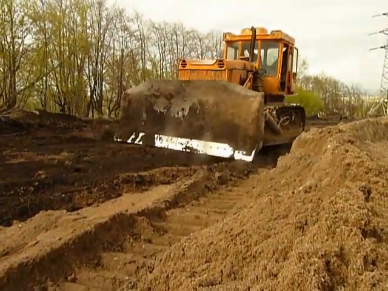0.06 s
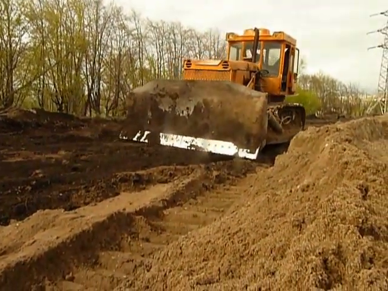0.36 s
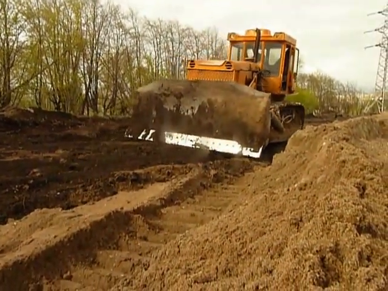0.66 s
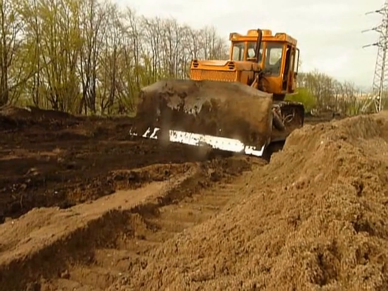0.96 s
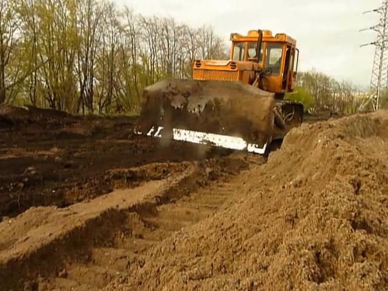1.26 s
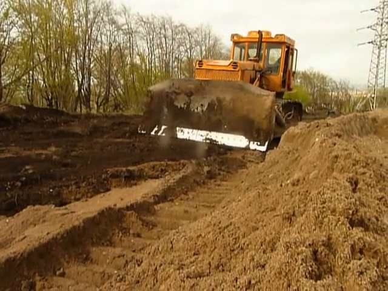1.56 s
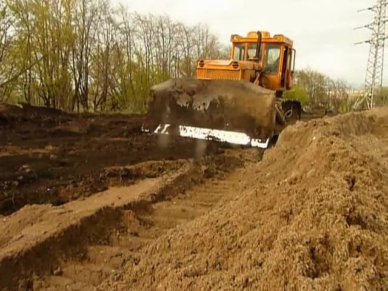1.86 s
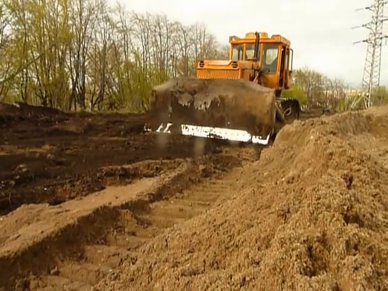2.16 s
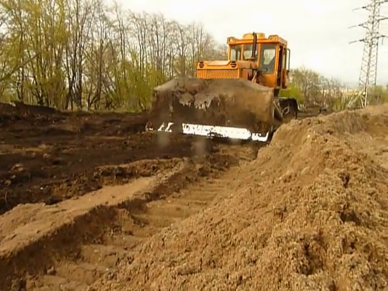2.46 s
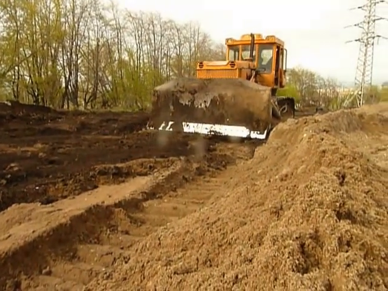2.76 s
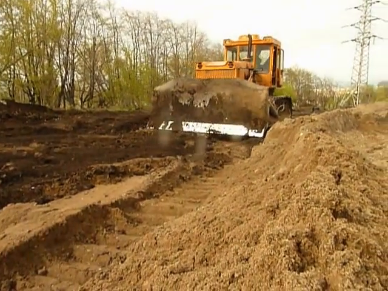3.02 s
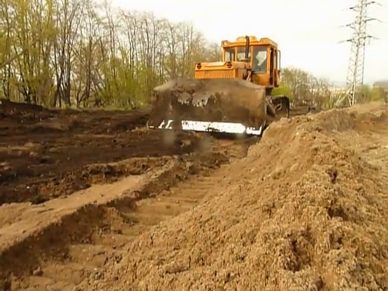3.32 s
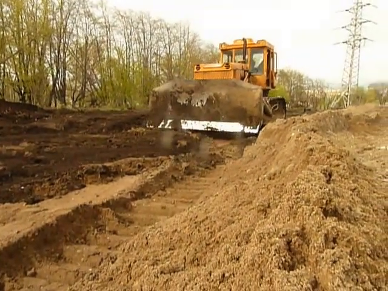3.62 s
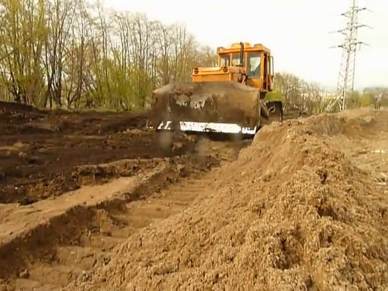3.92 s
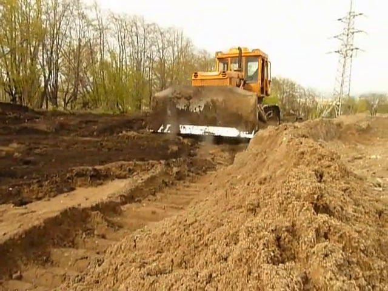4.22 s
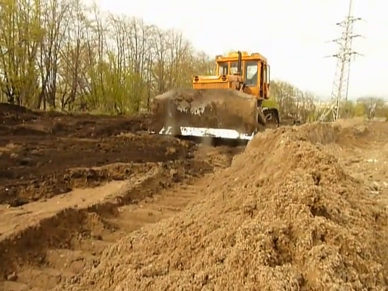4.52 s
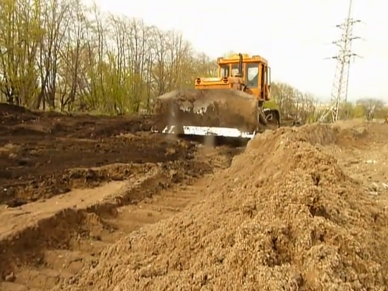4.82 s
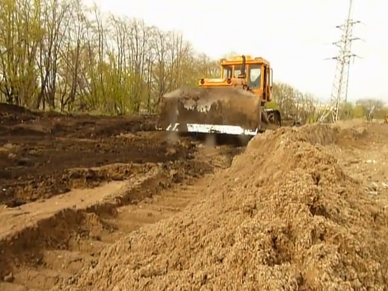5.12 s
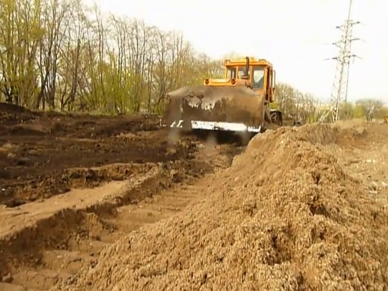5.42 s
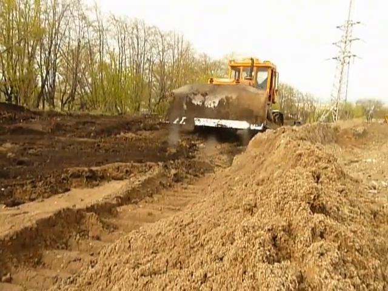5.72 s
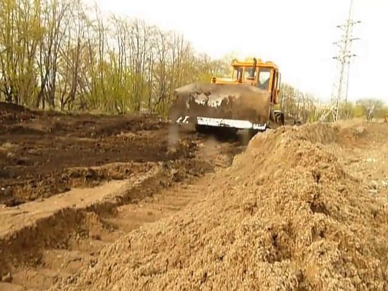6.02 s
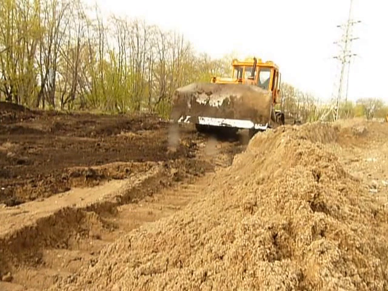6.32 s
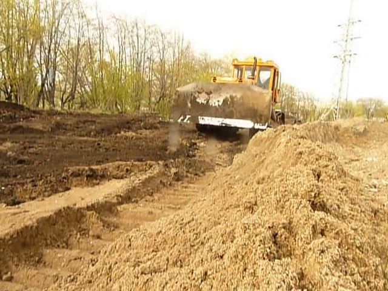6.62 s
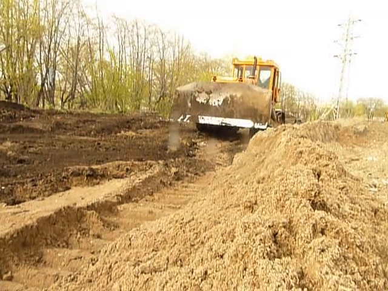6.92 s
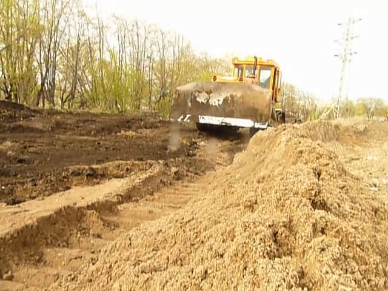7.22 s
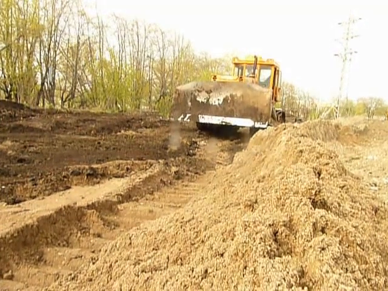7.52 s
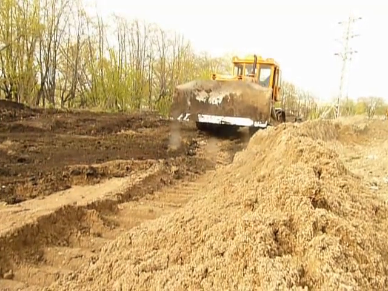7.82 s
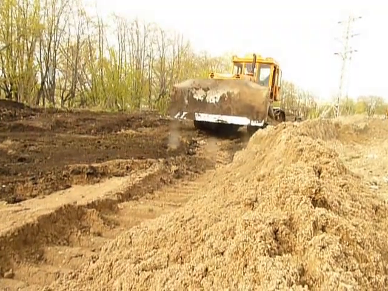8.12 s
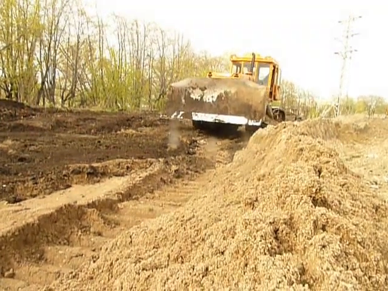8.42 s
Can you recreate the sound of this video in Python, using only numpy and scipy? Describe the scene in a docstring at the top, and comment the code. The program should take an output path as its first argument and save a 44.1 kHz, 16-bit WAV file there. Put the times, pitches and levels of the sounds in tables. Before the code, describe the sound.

A bulldozer's diesel engine runs outdoors for nearly nine seconds, heard from some distance as it slowly backs away. From the start there is a rapid, deep exhaust thudding with rumble, a hollow growl and steel clatter in the same rhythm. A thin, high turbo whine flutters on top, with faint gear tones underneath and occasional short, sharp knocks. Dull thumps come at about 2.5 and 3.8 seconds, with softer ones scattered until 7 seconds. The whine grows stronger around 5 seconds and drifts slightly lower in pitch. Near 6 seconds the engine briefly quickens as the load comes off, then sags and slows, with a faint metallic ring. Just after 7 seconds it picks up with a quick cluster of hard knocks and keeps thudding, clattering and whining to the end.

```python
"""A bulldozer's four-cylinder diesel thuds about 29 times a second as the machine backs away outdoors. Each
firing sends a pulse up the exhaust stack, rattles the steel and makes hood and stack growl. A high whine
flutters with the firings, over rumble, gear tones and a few dull thumps. Near 6 s the load comes off for a
second; the engine sags, then picks up with hard knocks."""
import sys
import numpy as np
from scipy import signal
from scipy.fft import rfft, irfft, next_fast_len
from scipy.io import wavfile
from scipy.ndimage import uniform_filter1d, map_coordinates

SR = 44100
rng = np.random.default_rng(int(sys.argv[2]) if len(sys.argv) > 2 else 0)


def waveform_to_disk(signal):
    """Save audio, clipped to [-1, 1], as 16-bit WAV at the path in sys.argv[1]."""
    frames = np.transpose(np.atleast_2d(signal))
    scaled = np.clip(frames, -1, 1) * 32767
    samples = np.round(scaled).astype(np.int16)
    wavfile.write(sys.argv[1], SR, samples)


N = 382347

# engine speed: time_s, firings_per_s
ENGINE_SPEED = [(0, 29.4), (1.6, 29.22), (3.5, 29.28), (4.4, 28.61), (4.9, 27.5), (5.4, 28.04), (5.7, 30.7),
                (6.1, 30.83), (6.5, 27.8), (7.15, 23.84), (7.4, 27.6), (7.65, 28.79), (7.95, 27.15),
                (8.3, 27.9), (8.67, 29.42)]
# how hard the engine works: time_s, load_db
ENGINE_LOAD = [(0, -0.5), (1.5, -1.5), (3.5, 0.5), (5.6, -2.5), (5.95, -5.5), (7.0, -9.5), (7.25, -7),
               (8.67, 0.5)]
# how freely it runs without load: time_s, amount (0 to 1)
COASTING = [(3.8, 0), (4, 0.55), (4.25, 0.55), (4.4, 0), (5.88, 0), (6.05, 1), (7, 1), (7.17, 0)]
# how far away the bulldozer is: time_s, distance_m
DISTANCE = [(2, 20.5), (5.8, 27.74)]


def exhaust(firings, stack_lag=0.041):
    """Each opening valve sends a pressure pulse out of the stack, stack_lag of a firing later."""
    pipe_colour = [(15, -41.5), (29, -15.5), (58, -2), (80, 3), (90, 1.8), (108, 0), (118, 2), (138, -1.5),
                   (148, -7.5), (175, -14), (240, -20), (300, -20.5), (500, -28), (1200, -72.5)]  # frequency_hz, gain_db
    level_rule = (-30, 9.5, 1.04, -1.5, 0.73)  # columns as in level()
    pull = [(0, -0.5), (1.4, 0.5), (3.6, 0.1), (4.8, 2), (7, -1.5), (7.3, 5), (8.1, 3.5), (8.67, 2)]  # extra push, most as the engine picks up: time_s, gain_db
    valve_opens = np.diff(np.floor(firings - stack_lag), prepend=0)
    pulses = resonate(-valve_opens * per_firing(firings, "exhaust", scatter_db=0.5), pipe_colour)
    return level(level_rule) * amp(curves(pull)[0]) * unit(pulses)


def rushing_gas(firings, blow):
    """Swirling gas gushes with each firing: a deep rumble, a boom above it and a higher roar."""
    # tone colours: frequency_hz, gain_db
    rumble_colour = [(12, -39), (24, -14.5), (45, -5), (80, 0), (115, -4), (150, -7.5), (220, -30.5),
                     (450, -71.5)]
    boom_colour = [(50, -25), (100, -9.5), (135, 1), (180, 1), (240, -3), (300, -10), (450, -18.5),
                   (900, -52.5), (2000, -89)]
    roar_colour = [(150, -27.5), (280, -8), (340, -2.5), (395, 0.5), (460, -6), (540, -1), (650, 0.5),
                   (760, -2), (880, -1.5), (1100, -12), (1330, -7), (1500, -26.5), (2500, -16), (6000, -69)]
    # loudness: time_s, level_db
    rumble_level = [(0, -38), (1, -36.5), (2, -36.5), (3, -37), (3.6, -35), (4.7, -35), (5.2, -36),
                    (5.8, -33), (6.3, -35.5), (7, -33), (7.3, -38), (8.67, -38)]
    boom_level = [(0, -37), (1.1, -39.5), (1.7, -34.5), (3, -36), (4.6, -37), (5.7, -34.5), (6.45, -40.5),
                  (7, -36), (7.55, -39.5), (8.1, -36), (8.67, -36)]
    roar_rule = (-32.5, 7.5, 0.34, -0.27, -0.1)  # columns as in level()
    gush = blow * hump(firings, centre=0.19, width=0.23)
    rumble_db = curves(rumble_level)[0] + 0.28 * wobble(4)
    rumble = amp(rumble_db) * unit(noise(rumble_colour) * (1 + 0.5 * gush))
    boom = amp(curves(boom_level)[0]) * unit(noise(boom_colour) * (1 + 1.1 * gush))
    roar = level(roar_rule) * unit(noise(roar_colour) * (1 + 0.82 * gush))
    return rumble + boom + roar


def rattling_steel(stroke, blow):
    """Each blow of burning fuel shakes the engine block: clatter, a steel ping and a hiss."""
    # tone colours: frequency_hz, gain_db
    rattle_colour = [(300, -11.5), (700, -1), (1100, 0), (1320, 4.5), (1480, 2.5), (1850, 5.5),
                     (2400, -2.5), (2900, -1), (3500, 0), (4000, -4), (4800, -11), (5400, -22.5),
                     (7000, -58.5)]
    block_colour = [(400, -11.5), (800, 1), (1050, -1.5), (1280, 6), (1480, 1.5), (1800, 5.5), (2350, -3),
                    (2900, -1), (3150, -5.5), (3500, 2), (4000, -7.5), (4800, -7), (5400, -18), (7000, -47)]
    hiss_colour = [(2000, -29), (4000, 1.5), (5000, -2.5), (5700, -2), (6300, -9), (7000, -17.5),
                   (7600, -45)]
    # changes in strength: time_s, gain_db
    harshness = [(0, 2.5), (3, 2), (4.2, -2), (5, 3.5), (5.7, -3.5), (6.15, 4.5), (7.2, 5), (7.6, 0),
                 (8.67, 2.5)]  # how far the blows stand out of the steady rattle
    clatter_trim = [(0, -1.5), (1.7, 1), (2.65, -1.5), (3.05, 1.2), (3.7, 0), (4, 1.8), (4.35, -0.5),
                    (4.55, -0.3), (5, 0.1), (7.2, 4.5), (7.7, 1), (8.3, 0.5), (8.67, 0.5)]
    ping_level = [(0, -74), (5.9, -58), (6.6, -47.5), (7.5, -56.5), (8.67, -58)]  # clearest while coasting
    hiss_level = [(0, -50.5), (1.7, -49.5), (2.65, -51), (3.15, -48.5), (3.75, -52.5), (4, -47),
                  (4.35, -54.5), (5, -51.5), (5.95, -54), (6.3, -53.5), (7.9, -54.5), (8.3, -50),
                  (8.67, -51)]
    clatter_rule = (-36, 6, 0.67, -0.02, 0.48)  # columns as in level()
    strike = hump(stroke, centre=0.27, width=0.089) + 0.65 * hump(stroke, centre=0.54, width=0.12)
    knock = amp(curves(harshness)[0]) * blow * strike
    clatter_gain = amp(curves(clatter_trim)[0]) * level(clatter_rule)
    clatter = clatter_gain * unit(noise(rattle_colour) + 1.11 * knock * noise(block_colour))
    ping = amp(curves(ping_level)[0]) * unit(band(hz=2920, width_hz=95) * (0.5 + strike))
    hiss = amp(curves(hiss_level)[0]) * unit(noise(hiss_colour) * (1 + 0.67 * knock))
    return clatter + ping + hiss


def high_whine(stroke, surge_s=0.012, scatter_db=2.2):
    """A high whine flares at each exhaust pulse and, under load, swells before the next."""
    whine = [(0, 4680, -45.5), (2.7, 4510, -46), (3.4, 4427, -42.5), (3.95, 4360, -40), (4.35, 4320, -46),
             (4.5, 4260, -39.5), (4.7, 4243, -38.5), (4.87, 4270, -35.5), (5, 4280, -32), (5.12, 4320, -35),
             (5.32, 4380, -37.5), (5.5, 4448, -40.5), (5.7, 4475, -41), (5.95, 4476, -46),
             (6.25, 4345, -37), (6.55, 4290, -41), (6.8, 4140, -45), (7.05, 4006, -38), (7.25, 4097, -35),
             (7.75, 4143, -33.5), (8.1, 4064, -35), (8.67, 4135, -33.5)]  # time_s, base_pitch_hz, base_level_db
    surges = [(3.955, 6), (4.99, 1), (5.026, 6), (5.316, 9), (5.458, 5), (6.416, 6), (7.268, 5.5),
              (8.388, 8), (8.526, 0)]  # the whine leaps out for one firing: time_s, boost_db
    pitch_hz, level_db = curves(whine)
    t = np.arange(N) / SR
    surge_db = sum(db * np.exp(-((t - s) / surge_s) ** 2) for s, db in surges)
    gust = stroke + 0.045 * wobble(35)
    flare = hump(gust, centre=0.28, width=0.13) * per_firing(stroke, "flare", scatter_db)
    swell = hump(gust, centre=0.83, width=0.15) * per_firing(stroke - 0.2, "swell", scatter_db)
    drive = amp(curves(ENGINE_LOAD)[0]) ** 0.6 * (1 - 0.55 * curves(COASTING)[0])
    pitch_dip = hump(gust, centre=0.41, width=0.16) * amp(1.7 * wobble(22))
    waver_hz = 10 * wobble(12) + 34 * wobble(280)
    whine_hz = pitch_hz + 110 * (pitch_dip.mean() - pitch_dip) + 8 + waver_hz
    tone = np.sin(2 * np.pi * np.cumsum(whine_hz) / SR)
    choke = amp(-10 * hump(gust, centre=0.08, width=0.045))  # as each valve opens
    flutter = amp(2 * wobble(18) + 2.6 * wobble(190))
    strength = (0.08 + flare + 0.68 * drive * swell) * choke * flutter
    softened = np.tanh(0.36 * strength)  # the loudest moments level off
    return amp(level_db + 1.3 + surge_db) * unit(tone * softened)


def growl(firings, blow):
    """Each firing kicks the hollow hood and stack with a rough puff, and they ring until the next."""
    resonances = [(392.5, 3, 0.17), (642.3, -3.5, 0.21)]  # pitch_hz, relative_db, fade_s (time to fall 60 dB)
    loudness = [(0, -48), (3.3, -48.5), (4.8, -47), (6.3, -49), (7.3, -51.5), (8.67, -44.5)]  # time_s, level_db
    t = np.arange(SR // 5) / SR
    puffs = blow * hump(firings, centre=0.1, width=0.056) * rng.standard_normal(N)
    ring = sum(amp(db - 60 * t / fade_s) * np.sin(2 * np.pi * hz * t) for hz, db, fade_s in resonances)
    ringing = signal.fftconvolve(puffs, np.diff(ring))[:N]
    return amp(curves(loudness)[0]) * unit(ringing)


def knocks(fade_s, attack_s):
    """Hard firings bark out of the stack as short bursts of noise."""
    hard_firings = [(0.472, -21.5), (0.749, -19.5), (1.0184, -21.5), (1.704, -20.5), (1.974, -20),
                    (2.2453, -20.5), (2.9372, -20.5), (3.6217, -20), (4.0332, -21.5), (4.4508, -20),
                    (4.591, -21.5), (4.733, -20.5), (4.88, -24), (5.025, -20), (5.312, -19), (5.451, -19.5),
                    (7.1442, -18.5), (7.186, -21), (7.224, -22), (7.268, -24), (7.302, -21), (8.024, -20.5),
                    (8.169, -24), (8.3113, -22.5)]  # start_s, relative_db
    bursts, t = np.zeros(N + SR), np.arange(SR // 10) / SR
    rise = 1 - np.exp(-t / attack_s)
    for start_s, db in hard_firings:
        bursts[round(start_s * SR):][:len(t)] += amp(db - 8 - 60 * t / fade_s) * rise
    return bursts[:N] * noise([(200, -4), (700, 1), (2000, 4), (3300, -3.5), (4400, 0.5),
                               (5200, -9.5), (6200, -16), (7600, -43)])


def thumps(attack_s, drop_s):
    """Soft, heavy blows: a low tone drops quickly onto its pitch, with a puff of noise."""
    hits = [(2.554, -10.5, 151, 0.04), (3.203, -21, 141, 0.055), (3.810, -12, 235, 0.063),
            (4.101, -23, 109, 0.079), (4.242, -18, 186, 0.074), (4.268, -21, 110, 0.07),
            (4.307, -19, 118, 0.12), (5.263, -18, 160, 0.13), (5.339, -19, 115, .07),
            (5.443, -20, 120, 0.08), (5.467, -17.5, 125, .13), (5.651, -22, 100, .09),
            (5.779, -15.5, 111, .08), (5.820, -19.5, 90, .07), (6.089, -24.5, 151, 0.14),
            (6.26, -23, 158, .07), (6.643, -20, 90, 0.062), (6.774, -24, 136, 0.11),
            (7.134, -24, 149, 0.064)]  # start_s, relative_db, pitch_hz, fade_s (time to fall 60 dB)
    out, t = np.zeros(N + SR), np.arange(SR // 5) / SR
    puff = noise([(40, -4), (120, 4), (300, -0.5), (450, -8.5), (700, -22), (2000, -70.5)])
    rise = 1 - np.exp(-(t / attack_s) ** 2)
    for start_s, db, hz, fade_s in hits:
        start = round(start_s * SR)
        cycles = hz * (t + drop_s * (1 - np.exp(-t / drop_s)))
        body = np.sin(2 * np.pi * cycles) + 0.38 * puff[start:][:len(t)]
        out[start:][:len(t)] += amp(db + 2.5 - 60 * t / fade_s) * rise * body
    return out[:N]


def gears(firings):
    """Fan and gear tones follow the engine and throb with each firing; their mix shifts with distance."""
    gear_tones = [(8.37, -50, -59.5), (9.05, -53.5, -49), (13.79, -50, -49), (22.07, -48.5, -51.5),
                  (24.05, -54, -54.5), (45.17, -53, -55.5)]  # cycles_per_firing, near_db, far_db
    overall_gain = [(0, 0), (2, 2.5), (3.7, 1), (4.6, -2.5), (7.1, -3.5), (8.67, -0.5)]  # time_s, gain_db
    metres = curves(DISTANCE)[0]
    far = (metres - metres.min()) / np.ptp(metres)
    tones = np.zeros(N)
    for cycles_per_firing, near_db, far_db in gear_tones:
        strength = amp(near_db + (far_db - near_db) * far + 2 * wobble(12))
        tones += strength * unit(np.sin(2 * np.pi * cycles_per_firing * firings + 0.79 * wobble(12)))
    throb = 0.82 + 0.98 * hump(firings, centre=0.3, width=0.094)
    return amp(curves(overall_gain)[0] - 1.5) * tones * throb


def hum(firings, cycles_per_firing=7.7):
    """A low, wavering tone follows the engine and fades as it first slows."""
    loudness = [(0, -49), (1.2, -44.5), (1.8, -44), (3.4, -40), (4.3, -41.5), (4.8, -54)]  # time_s, level_db
    strength = amp(curves(loudness)[0] + 0.86 * wobble(4.5))
    return strength * unit(np.sin(2 * np.pi * cycles_per_firing * firings + 0.5 * wobble(12)))


def whistle(firings, hz, width_hz):
    """Rushing air makes a breathy whistle below the whine, puffing with each firing."""
    loudness = [(0, -48.5), (2, -46.5), (2.8, -60.5), (8.67, -52.5)]  # time_s, level_db
    puffing = 1 + 0.59 * hump(firings, centre=0.17, width=0.13)
    return amp(curves(loudness)[0]) * unit(band(hz, width_hz) * puffing)


def per_firing(firings, part, scatter_db):
    """Strength of each firing: its cylinder's own plus chance. Coasting evens them out a little."""
    cylinders = [(-1.5, 0, 3.5, -1), (-1.5, 0.5, 5, 4.5), (1.5, 2, 3, 5), (-2.5, -1, 3.5, 0.5)]  # in firing order: exhaust_db, blow_db, flare_db, swell_db
    column = ["exhaust", "blow", "flare", "swell"].index(part)
    index = firings.astype(int)
    own_db = np.array(cylinders)[index % len(cylinders), column]
    chance_db = scatter_db * rng.standard_normal(index[-1] + 1)[index]
    unevenness = 1 - 0.17 * curves(COASTING)[0]
    return uniform_filter1d(amp(unevenness * (own_db + chance_db)), size=128)


def level(rule, near_m=20, cruise_firings_per_s=29):
    """Gain of one layer: it falls with distance, follows load and speed, and drifts a little."""
    near_db, loss_db_per_doubling, db_per_load_db, db_per_firing_rate, drift_db = rule
    distance_db = loss_db_per_doubling * np.log2(curves(DISTANCE)[0] / near_m)
    load_db = db_per_load_db * curves(ENGINE_LOAD)[0]
    speed_db = db_per_firing_rate * (curves(ENGINE_SPEED)[0] - cruise_firings_per_s)
    return amp(near_db - distance_db + load_db + speed_db + drift_db * wobble(3))


def hump(firings, centre, width):
    """A smooth bump once per firing; centre and width are fractions of a firing."""
    return np.exp((np.cos(2 * np.pi * (firings - centre)) - 1) / (2 * np.pi * width) ** 2)


def amp(db):
    """Turn decibels into a gain."""
    return 10 ** (np.asarray(db) / 20)


def unit(x):
    """Scale to an average strength (rms) of 1."""
    return x / np.sqrt(np.mean(x ** 2) + 1e-20)


def curves(rows):
    """One value per sample for each column after the time."""
    times_s, *columns = np.transpose(rows)
    return [np.interp(np.arange(N) / SR, times_s, column) for column in columns]


def wobble(rate):
    """A smooth curve through rate random points a second."""
    return map_coordinates(rng.standard_normal(int(N * rate / SR) + 4), [np.arange(N) * rate / SR])


def gain(colour, size):
    """Join (frequency_hz, gain_db) points into a gain for every FFT frequency."""
    hz, db = np.transpose(colour)
    return amp(np.interp(np.log(np.fft.rfftfreq(size, 1 / SR) + 1), np.log(hz), db))


def noise(colour):
    """Noise with the given tone colour."""
    size = next_fast_len(N + 8192)
    return unit(irfft(rfft(rng.standard_normal(size)) * gain(colour, size), size)[:N])


def band(hz, width_hz):
    """Narrow noise around one pitch."""
    return noise([(hz / 2, -60), (hz - 2 * width_hz, -16), (hz, 0),
                  (hz + 2 * width_hz, -16), (hz * 2, -80)])


def resonate(x, colour, size=16384):
    """Pass x through a ringing body with the given tone colour."""
    cepstrum = irfft(np.log(gain(colour, size)))
    # fold it so the ringing comes after each pulse, never before
    cepstrum[1:size // 2] *= 2
    cepstrum[size // 2 + 1:] = 0
    return signal.fftconvolve(x, irfft(np.exp(rfft(cepstrum))))[:N]


def scene():
    """One running count of firings keeps the engine in step; a valve opens at each whole number."""
    firings = np.cumsum(curves(ENGINE_SPEED)[0]) / SR + 0.28
    stroke = firings + 0.13 * curves(COASTING)[0]  # clatter and whine come earlier when coasting
    blow = per_firing(firings, "blow", scatter_db=1.2)
    tones = high_whine(stroke) + whistle(firings, hz=3418, width_hz=60) + gears(firings) + hum(firings)
    hits = knocks(fade_s=0.075, attack_s=0.0015) + thumps(attack_s=0.0052, drop_s=0.002)
    engine = exhaust(firings) + rushing_gas(firings, blow) + rattling_steel(stroke, blow)
    return (engine + growl(firings, blow) + tones + hits)[None]


def record(dry, low_cut_hz=22, top_hz=7700):
    """Cut the deepest bass and all treble above top_hz."""
    size = next_fast_len(N + 8192)
    hz = np.fft.rfftfreq(size, 1 / SR)
    bass_cut = 1 - np.exp(-(hz / low_cut_hz) ** 4)
    return irfft(rfft(dry, size) * bass_cut * (hz < top_hz), size)[:, :N]


dry = scene()
out = record(dry)
waveform_to_disk(out)
```